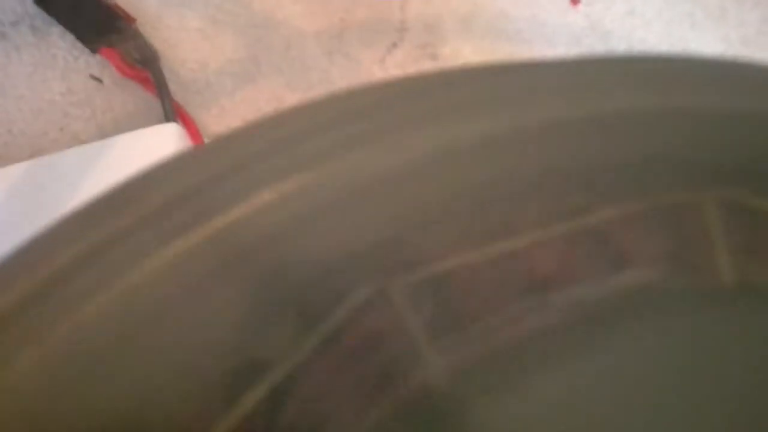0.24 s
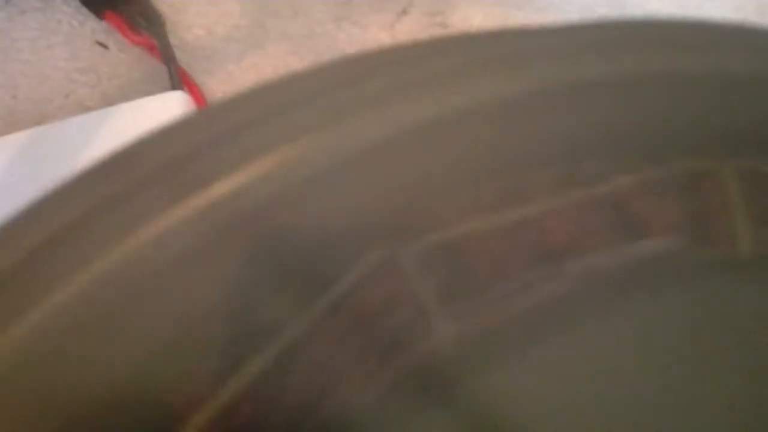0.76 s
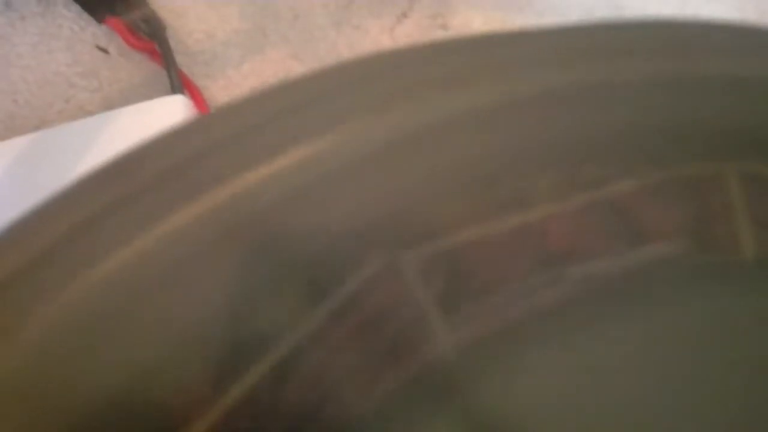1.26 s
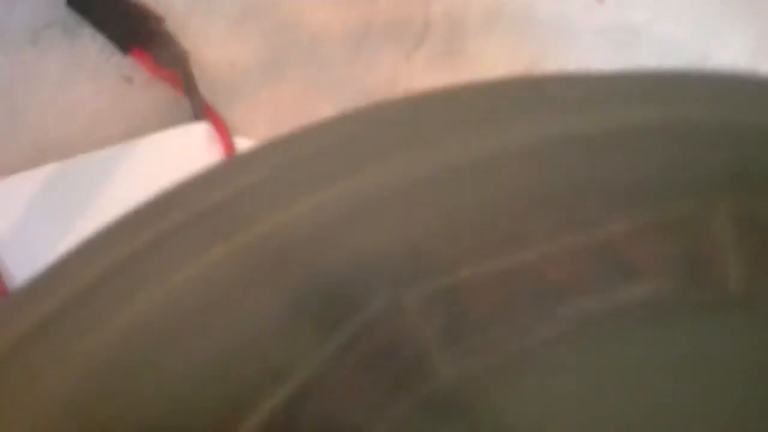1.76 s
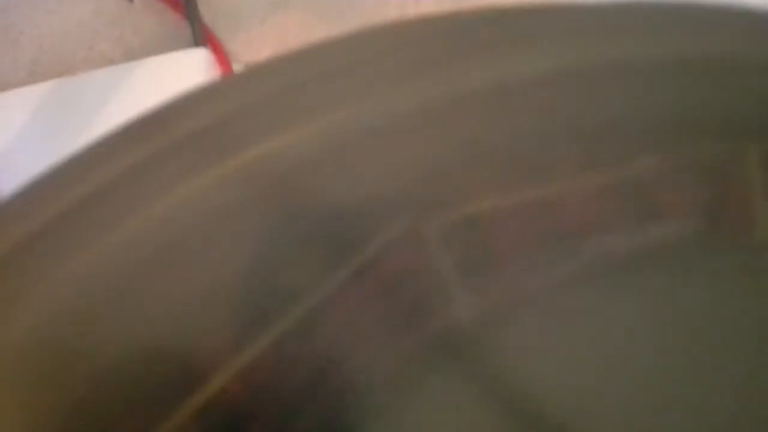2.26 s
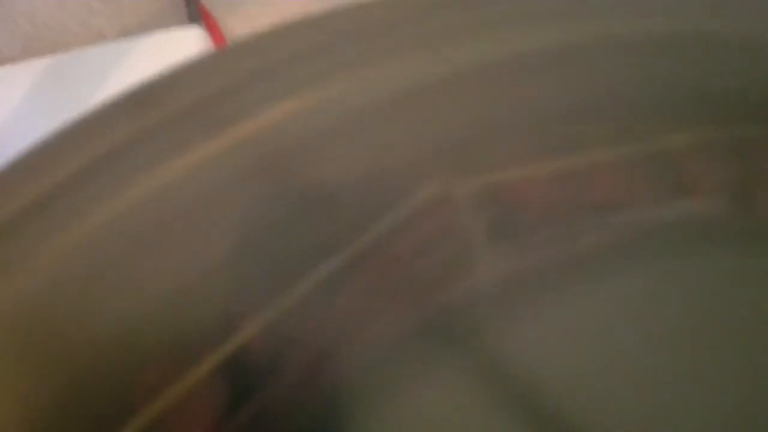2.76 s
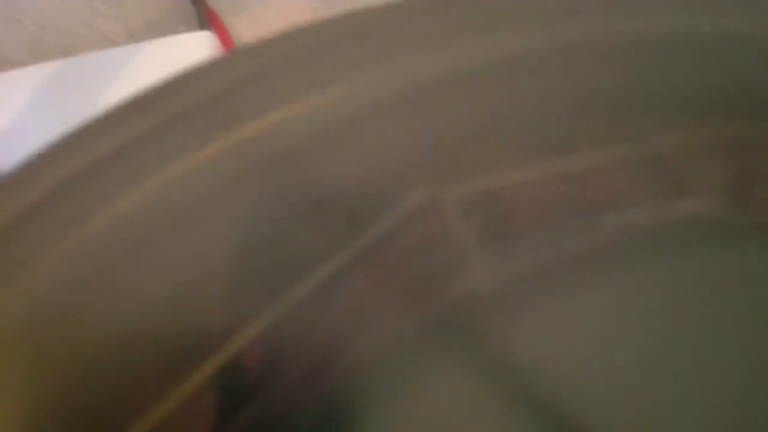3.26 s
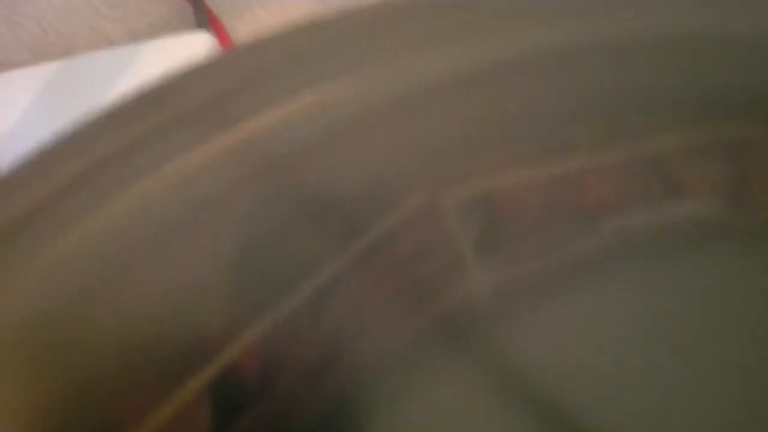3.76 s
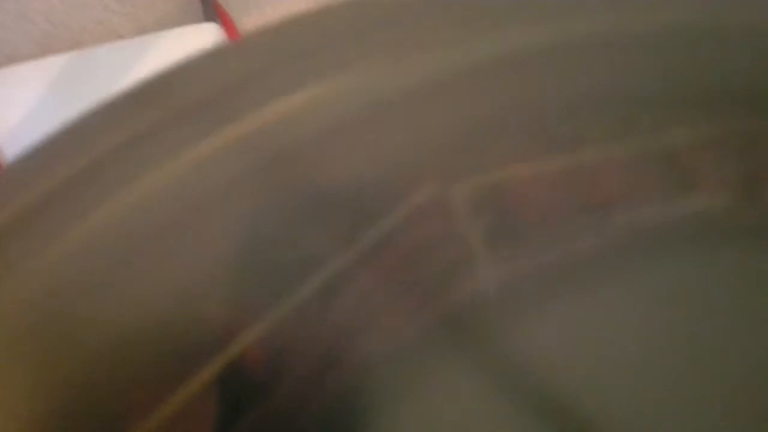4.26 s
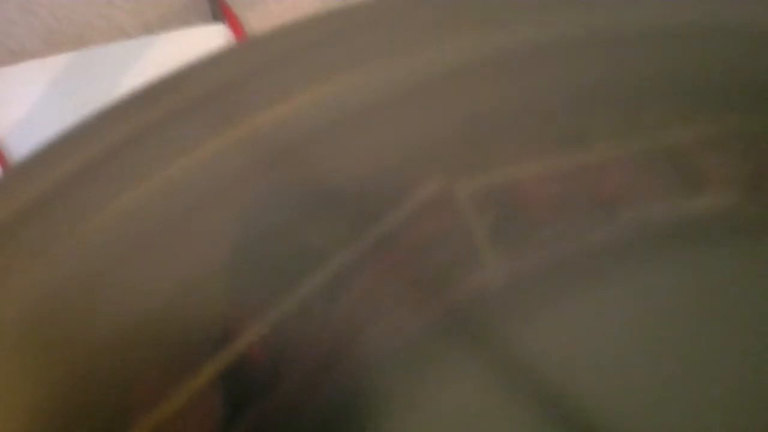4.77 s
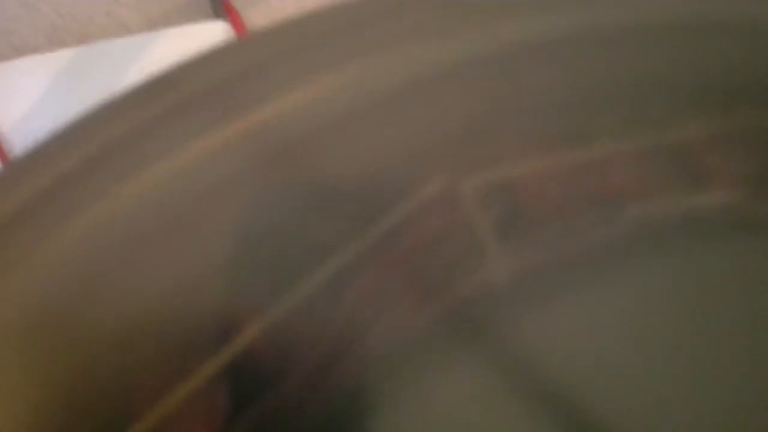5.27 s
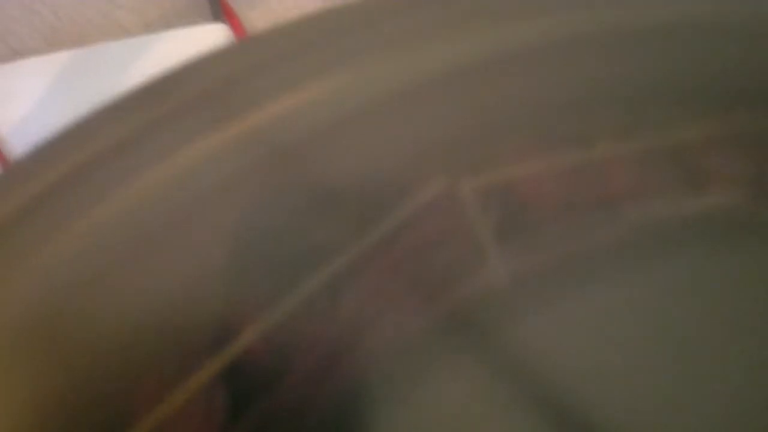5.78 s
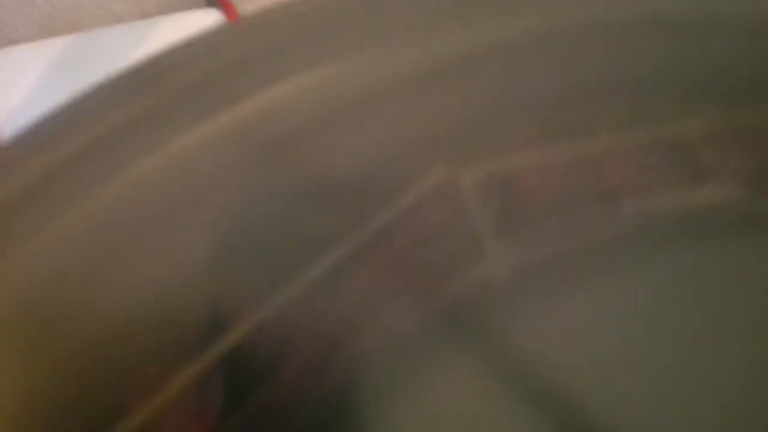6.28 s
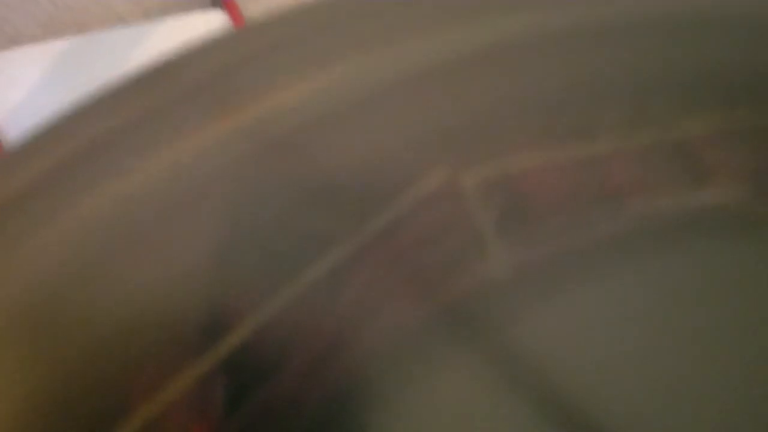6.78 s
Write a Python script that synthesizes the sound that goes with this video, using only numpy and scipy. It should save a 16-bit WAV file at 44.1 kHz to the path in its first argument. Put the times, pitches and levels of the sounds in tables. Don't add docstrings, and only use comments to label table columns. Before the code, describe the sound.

Close to a microphone in a quiet room, an electric hub motor wheel spins freely. Its soft whirring whine creeps upward in four short surges, with a thin high whistle and ticking once per turn. Then it revs up sharply, growing louder and grittier, and holds a steady metallic whine with rapid knocking and rushing air.

```python
import sys
import numpy as np
from scipy import signal
from scipy.fft import rfft, irfft, next_fast_len
from scipy.io import wavfile
from scipy.ndimage import map_coordinates

SR = 44100
rng = np.random.default_rng(int(sys.argv[2]) if len(sys.argv) > 2 else 0)


def master_out(mix):
    frames = np.transpose(np.atleast_2d(mix))
    ceiling = np.clip(frames, -1, 1)
    pcm = np.round(ceiling * 32767).astype(np.int16)
    wavfile.write(sys.argv[1], SR, pcm)


def field_ratio(decibels):
    return 10 ** (np.asarray(decibels, dtype=float) / 20)


N = 310023
MAGNETS = 46

# time_s, speed_rpm
WHEEL_SPEED = [(0, 233.9), (.28, 249.5), (.66, 265.3), (.8, 277.3), (1.3, 316.0), (1.62, 338.4),
               (1.79, 355.1), (2.31, 367.7), (2.5, 413.4), (2.7, 477.7), (2.95, 513.9), (3.1, 546.3),
               (3.2, 558.6), (3.3, 564.2), (7.03, 564.16)]
# time_s, pull_db
THROTTLE = [(0, -29.5), (.72, -28), (1.68, -25.5), (2.33, -25), (2.4, -20), (2.74, -20.5), (3.15, -18),
            (3.24, -24), (7.03, -23)]
# start_s, length_s, tones_louder_db
SURGES = [
    (.05, .18, 5.5),
    (.72, .18, 4.5),
    (1.13, .17, 5.5),
    (1.43, .25, 6),
]
SURGE_EDGE_S, BETWEEN_SURGES_DB = .015, -2.5

# pitch_hz, level_db
AIR_COLOUR = [(60, -41.5), (200, -26), (420, -11.5), (850, -3), (1300, -4), (1800, -15.5), (2700, -11.5),
              (4000, -23.5), (8000, -34), (15000, -61)]
AIR_DB, AIR_GROWS, AIR_YIELDS = -24, 2, 0.64
# pitch_hz, level_db
WHISTLE_COLOUR = [(8000, -51), (10000, -10), (12300, -23), (13600, -7), (14800, -18), (15400, 6),
                  (15700, -7.5)]
WHISTLE_DB, WHISTLE_GROWS, WHISTLE_LEFT_DB = -18.5, 0.85, -70
HISS_DB, HISS_FOLLOWS = -25.5, 0.091

# pitch_hz, level_db
SHELL = [(60, -67), (300, -22.5), (600, -16), (1200, -37.5), (1550, -18.5), (1800, -36), (2600, -14),
         (4300, -15), (5300, -20), (5900, -25.5), (7000, -14.5), (8300, -20.5), (12300, -28), (14000, -44),
         (15300, -15)]
# pitch_hz, width_hz, level_db
COVER_RINGS = [(248.7, 6.2, -14), (742.3, 27, -11.5), (968, 78, -3.5), (1318, 204, 2.5), (1481, 66, -7.5),
               (2088, 370, -10), (3175, 113, -12), (3496, 320, -18), (5003, 295, -15), (7643, 230, -4.5),
               (8080, 220, -11), (9210, 285, -16), (13500, 830, -21.5)]

# angle_turns (0-1), level_db, ring_hz, t60_s, power_of_speed
KNOCKING_SPOTS = [(.15, -1.5, 1315, .02, 1.4), (.148, -10, 850, .012, 1.2), (.152, -16, 2300, .008, 1),
                  (.146, -16, 4900, .008, 1), (.23, -9.5, 1310, .022, .1), (.226, -18, 900, .012, .3),
                  (.222, -11, 3700, .005, 1.5), (.222, -18, 2900, .005, 1), (.325, -15, 1250, .02, 1),
                  (.397, -13, 1300, .02, 1), (.575, -14, 1300, .02, 1), (.942, -20, 2400, .012, 1),
                  (.58, -21, 2400, .01, 1), (.48, -15, 7700, .012, .3)]
KNOCK_LAG_TURNS = .045

TONE_CYCLES = [46, 92, 101, 138, 152, 154, 184, 230, 276, 322, 368, 414, 460, 506, 552, 598, 736, 782, 851,
               920, 1058, 1196]
# level_db at full speed, power_of_speed
TONE_STRENGTHS = [(-40.5, 2.2), (-29, 2), (-29, 9), (-33.5, -2), (-23.5, 11), (-28, 2.5), (-28, 2.5),
                  (-38.5, -.5), (-41, 1), (-35, 2.4), (-40, 0), (-33, 2.5), (-42.5, 1), (-42.5, 0.5),
                  (-40.5, 1.4), (-55, -0.9), (-51.5, -1.5), (-34.5, 1.1), (-40, 1), (-42.5, 0.5),
                  (-54.5, .1), (-54, -.1)]
TONE_SWELLS = {92: (2.3, .7, .7, .47), 101: (.6, .3, .6, .1), 152: (1, .13, 3.5, .03),
               184: (1.5, .99, 1.2, .37), 230: (1.5, .4, 2.5, .44), 276: (1.4, .4, 1.9, .25),
               322: (3.5, .71, 6.5, .2), 368: (.8, .14, 3.5, .17), 414: (4.5, .71, 2.5, .14),
               460: (1.2, .93, 3.5, .02), 552: (3.5, .13, 2.8, .27), 782: (2.5, .06, 5, .0),
               851: (1.5, .17, 3, .3), 920: (1.7, .47, 4, .02)}
SWELL_DB = 2.5
SHARP_CYCLES, SHARPENS = 250, .7

# start_s, depth_db, recovery_s
GAIN_DIPS = [
    (2.833, 4.5, 0.059),
    (5.49, 3, .04),
]
DIP_ATTACK_S = 0.0015


def unit(x):
    return x / np.sqrt(np.mean(x ** 2) + 1e-20)


def along(points, hz):
    f, v = np.transpose(points)
    return np.interp(np.log(hz + 1), np.log(f + 1), v)


def curve(rows):
    s, value = np.transpose(rows)
    return np.interp(np.arange(N) / SR, s, value)


def wobble(rate):
    knots = rng.standard_normal(int(N * rate / SR) + 4)
    return map_coordinates(knots, [np.arange(N) * rate / SR])


def coloured(x, gain):
    size = next_fast_len(N + 8192)
    cepstrum = irfft(np.log(gain(np.fft.rfftfreq(size, 1 / SR)) + 1e-6), size)
    cepstrum[1:size // 2] *= 2
    cepstrum[size // 2 + 1:] = 0
    return irfft(rfft(x, size) * np.exp(rfft(cepstrum)), size)[:N]


def hiss(gain, rate, flutter_db):
    noise = rng.standard_normal(N) * field_ratio(flutter_db * wobble(rate))
    return unit(coloured(noise, gain))


def housing(hz, shell_db=0):
    rings = sum(field_ratio(db) / (1 + (2 * (hz - centre_hz) / width_hz) ** 2)
                for centre_hz, width_hz, db in COVER_RINGS)
    return (field_ratio(along(SHELL, hz) + shell_db) + rings) / (1 + (hz / 14500) ** 30)


def tyre_air(share, extra_db):
    level = field_ratio(AIR_DB - AIR_YIELDS * np.maximum(extra_db, 0)) * share ** AIR_GROWS
    return level * hiss(lambda hz: field_ratio(along(AIR_COLOUR, hz)), 12, 0.91)


def controller(share, extra_db):
    through_housing = field_ratio(HISS_DB + HISS_FOLLOWS * extra_db) * hiss(housing, 40, 0.85)
    switching = field_ratio(WHISTLE_DB) * (1 - share) ** WHISTLE_GROWS + field_ratio(WHISTLE_LEFT_DB)
    return through_housing + switching * hiss(lambda hz: field_ratio(along(WHISTLE_COLOUR, hz)), 90, 1.5)


def every_turn(turns, angles, sizes, slip, scatter_db):
    marks = (np.arange(-1, int(turns[-1]) + 2)[:, None] + angles).ravel()
    chance = rng.standard_normal((len(marks), 2))
    at = np.interp(marks, turns, np.arange(N), left=-99, right=N + 99) + slip * SR * chance[:, 0]
    size = np.resize(sizes, len(marks)) * field_ratio(scatter_db * chance[:, 1])
    tap = np.floor(at)[:, None] + np.arange(-7, 9)
    lag = tap - at[:, None]
    pulse = size[:, None] * np.sinc(lag) * np.cos(np.pi * lag / 16) ** 2
    keep = (tap >= 0) & (tap < N)
    return np.bincount(tap[keep].astype(int), pulse[keep], N)


def knocks(turns, share):
    out, t = np.zeros(N), np.arange(2000) / SR
    late_turns = turns - KNOCK_LAG_TURNS * (1 - share)
    for angle, db, hz, t60, harder in KNOCKING_SPOTS:
        onset = 1 - np.exp(-t / (0.086 * t60))
        ring = field_ratio(db - 60 * t / t60) * onset * np.sin(2 * np.pi * hz * t)
        hits = every_turn(late_turns, np.array([angle]), [1], slip=2e-5, scatter_db=.6)
        out += signal.fftconvolve(hits * share ** harder, ring)[:N]
    return 1.6 * out


def rotor(turns, spread, teeth_db, between_db, stiff_hz, drift=3e-5):
    size, top = 2 ** 15, MAGNETS * 46
    order = np.arange(top)
    reach = spread + .005 * (order / MAGNETS) ** 2

    def away(shift):
        return np.abs((order - shift + MAGNETS // 2) % MAGNETS - MAGNETS // 2)

    strength = np.exp(-away(0) / reach) + field_ratio(teeth_db) * np.exp(-away(9) / reach) + field_ratio(between_db)
    chance = rng.standard_normal((top, 2))
    strength *= field_ratio(3 * chance[:, 0]) / np.sqrt(reach)
    strength[TONE_CYCLES] = 0
    strength[np.add.outer(list(TONE_SWELLS), np.arange(-3, 4))] = 0
    turn = irfft(strength * np.exp(9j * chance[:, 1]), size)
    angle = (turns + drift * wobble(7)) % 1
    force = map_coordinates(turn, [angle * size], mode="grid-wrap")
    return unit(coloured(force, lambda hz: housing(hz) / (1 + (stiff_hz / (hz + 1)) ** 2)))


def surging():
    t = np.arange(N) / SR

    def on(s):
        return .5 + .5 * np.tanh((t - s) / SURGE_EDGE_S)

    last_s = SURGES[-1][0] + SURGES[-1][1]
    pushes_db = sum(db * (on(s) - on(s + length)) for s, length, db in SURGES)
    return BETWEEN_SURGES_DB * (1 - on(last_s)) + pushes_db


def tones(turns, rpm, load_db, coupling):
    out = np.zeros(N)
    slow_rpm = rpm[::64]
    full = rpm / rpm[-1]
    uneven_db = .7 + 1.5 * (1 - full)
    for cycles, (db, rise) in zip(TONE_CYCLES, TONE_STRENGTHS):
        start, first, second = rng.random(size=3)
        chance_swell = (SWELL_DB, first, SWELL_DB, second)
        once_db, first, twice_db, second = TONE_SWELLS.get(cycles, chance_swell)
        lit = housing(cycles * slow_rpm / 60, shell_db=-5)
        sweep = np.repeat((lit / lit[-1]) ** coupling * full[::64] ** rise, 64)[:N]
        swell_db = once_db * np.cos(2 * np.pi * (turns - first))
        swell_db += twice_db * np.cos(2 * 2 * np.pi * (turns - second))
        edge_db = SHARPENS * load_db * (cycles > SHARP_CYCLES)
        level_db = db + 2.5 + edge_db + swell_db * full + uneven_db * wobble(6)
        out += field_ratio(level_db) * sweep * np.sin(2 * np.pi * (cycles * turns + start))
    return out


def scene():
    rpm = curve(WHEEL_SPEED)
    turns, share = np.cumsum(rpm / 60) / SR, rpm / rpm.max()
    pull_db = curve(THROTTLE)
    extra_db = pull_db - pull_db[-1]
    air = tyre_air(share, extra_db)
    control = controller(share, extra_db)
    knocking = knocks(turns, rpm / rpm[-1])
    rumble = rotor(turns, spread=6.3, teeth_db=-13, between_db=-21.5, stiff_hz=1730)
    whine = tones(turns, rpm, np.maximum(extra_db, 0), coupling=0.95)
    motor = field_ratio(pull_db + 2.0) * rumble + field_ratio(0.2 * extra_db + surging()) * whine + knocking
    return np.tile(motor + control + air, (2, 1))


def gain_dips():
    dip_db = np.zeros(N)
    for start, depth_db, back in GAIN_DIPS:
        since = np.maximum(np.arange(N) / SR - start, 0)
        dip_db += depth_db * (1 - np.exp(-since / DIP_ATTACK_S)) * np.exp(-(since / back) ** 2)
    return field_ratio(-dip_db)


def low_pass(x):
    return signal.sosfilt(signal.butter(12, 15950, fs=SR, output="sos"), x)


def record(dry):
    dipped = dry[0] * gain_dips()
    soft = dipped / (1 + np.abs(dipped / .8) ** 6) ** (1 / 6)
    heard = coloured(soft, lambda hz: (hz < 15740) / np.sqrt(1 + (116 / (hz + 1)) ** 8))
    return low_pass(np.tile(heard, (2, 1)))


dry = scene()
out = record(dry)
master_out(out)
```